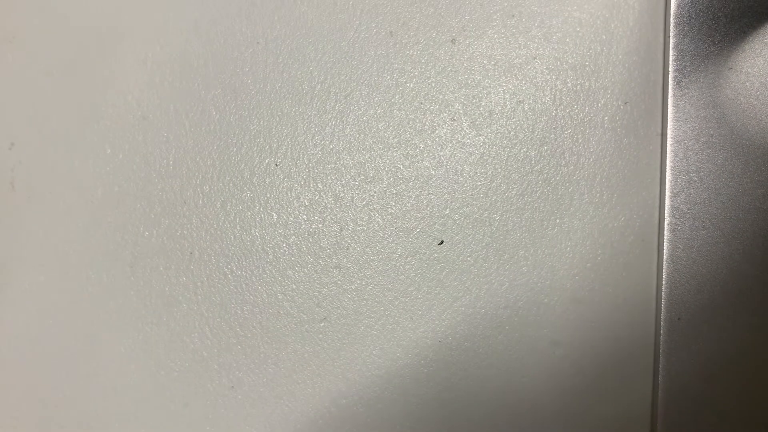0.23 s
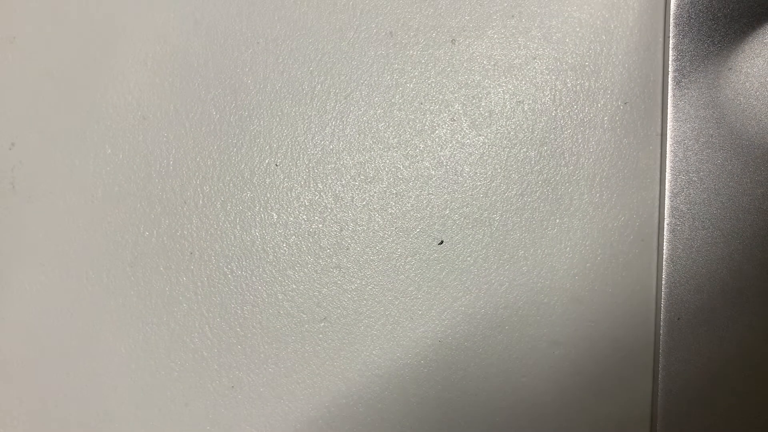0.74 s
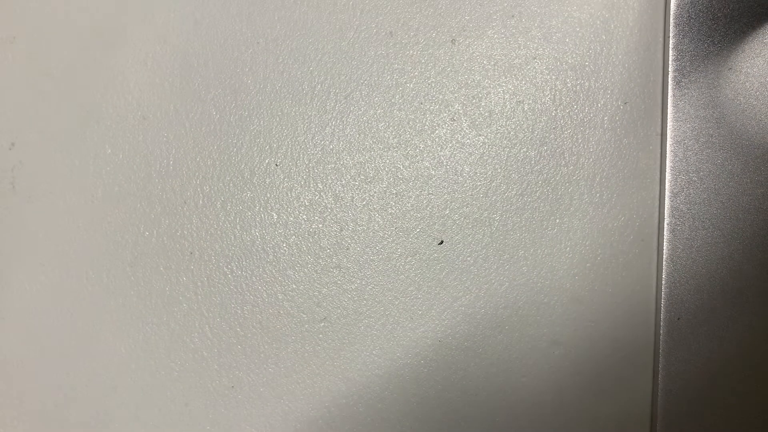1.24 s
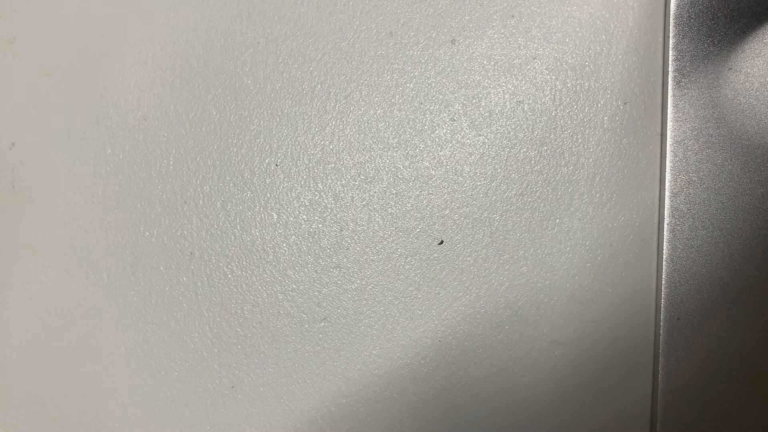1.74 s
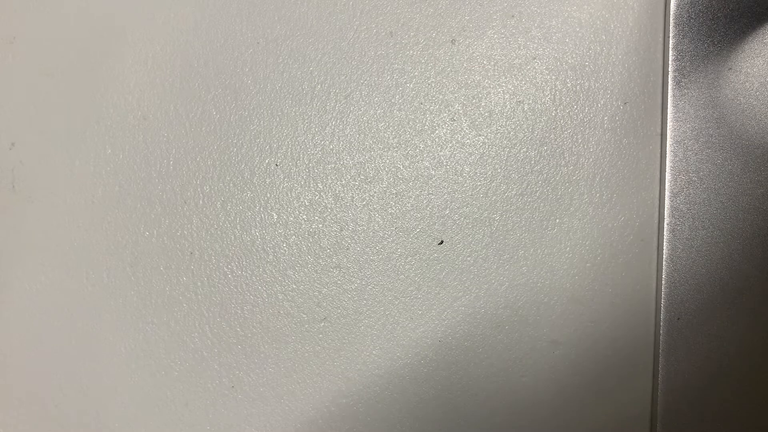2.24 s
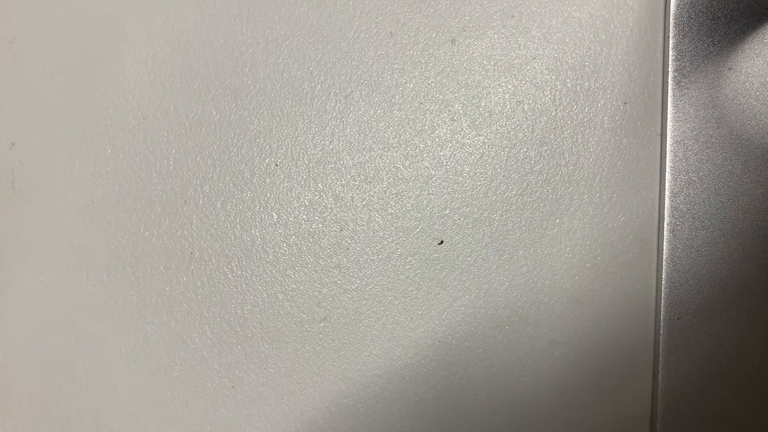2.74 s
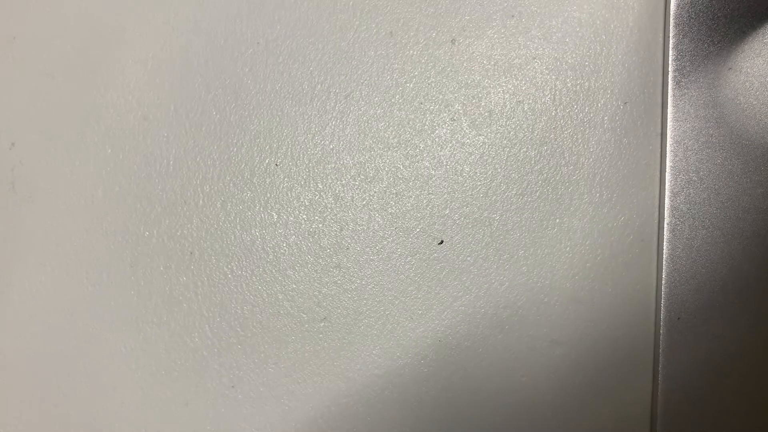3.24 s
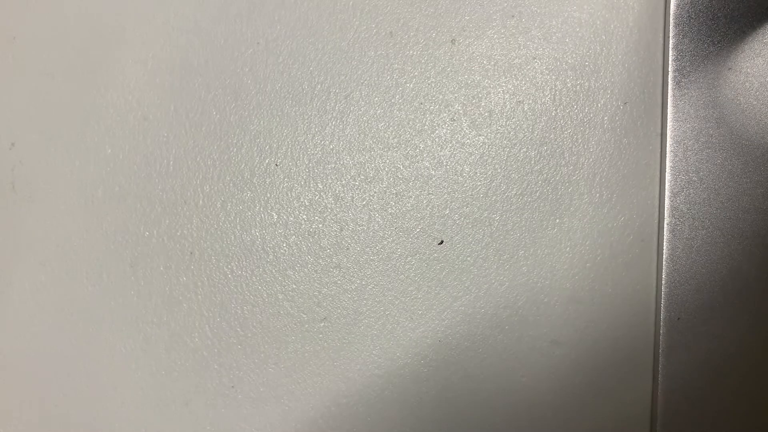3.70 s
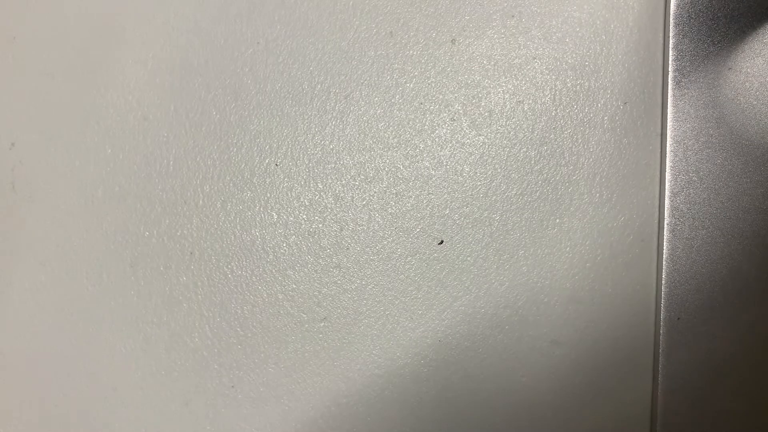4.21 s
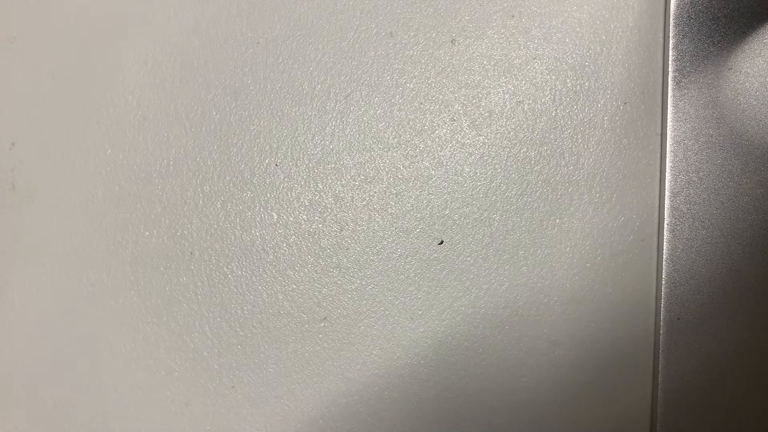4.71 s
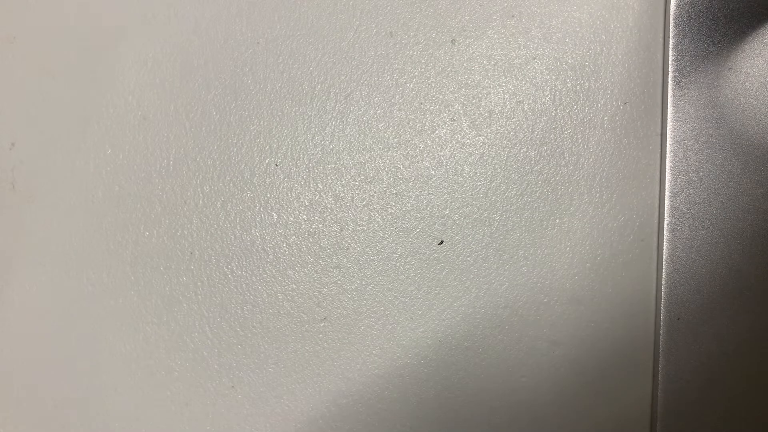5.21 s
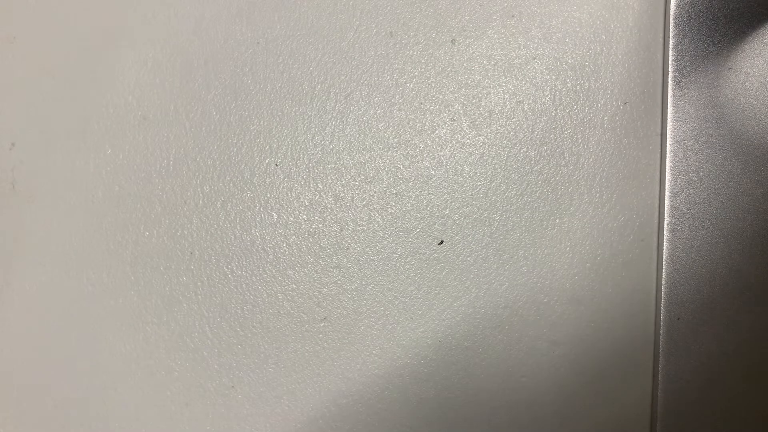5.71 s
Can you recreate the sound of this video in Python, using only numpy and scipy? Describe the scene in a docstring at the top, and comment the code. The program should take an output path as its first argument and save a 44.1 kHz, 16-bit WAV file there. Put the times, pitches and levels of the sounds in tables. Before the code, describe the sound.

A plastic blister pack is pulled from its card backing by hand, close to a stereo microphone in a small furnished room. A short rip opens the sound; at 0.2 seconds sharp snaps, tearing and soft hollow knocks come together, followed by rubbing and scattered pops until 0.8. A bright, strong cluster of cracks bursts at 1.2, then duller snaps at 1.4 and 1.6. Lighter clicks and crinkles continue, with a pop near 2.1 and a small rip at 2.7. A low thud at 2.95 leads to a hard snap at 3.1, then a dense flurry of buckling and tearing from 3.4 to 3.7. From 4 to 5.2 it is sparser: faint ticks, finger slides, muted knocks. A clear snap at 5.5 and a scraping rip around 5.7 end it. Each snap is dry with a brief plastic ring and a short room tail. Quiet air and a faint wavering low hum persist.

```python
"""A small furnished room: hands pull a plastic blister pack open, close to a stereo recorder.
The thin shell buckles in sharp snaps of decaying noise and ringing modes; the card backing tears away
in short rips built of many tiny fractures. Fingers rub and crinkle the pack, as noise with stick-slip grains,
and now and then knock it so that it booms softly, as a decaying sine with a scuff of noise.
Still air and a wavering low hum lie underneath."""
import sys
import numpy as np
from scipy import signal
from scipy.fft import rfft, irfft, next_fast_len
from scipy.io import wavfile

SR = 44100
rng = np.random.default_rng(int(sys.argv[2]) if len(sys.argv) > 2 else 0)


def digitize_waveform(pressure):
    """Quantize a signal to 16-bit integers and store it at the path in sys.argv[1].

    Rows of a 2-D input are taken as channels; values are limited to [-1, 1].
    """
    field = np.atleast_2d(pressure).T
    bounded = np.clip(field, -1, 1)
    quanta = np.round(bounded * 32767).astype(np.int16)
    wavfile.write(sys.argv[1], SR, quanta)


N = 262517
TIME = np.arange(N) / SR


def from_db(db):
    """Decibels to gain."""
    return 10 ** (np.asarray(db) / 20)


def rms_one(x):
    """Scale to unit power."""
    return x / np.sqrt(np.mean(x ** 2) + 1e-20)


def at_hz(points, hz):
    """Read a curve on a log-frequency axis."""
    where, value = np.transpose(points)
    return np.interp(np.log(np.maximum(hz, 1)), np.log(where), value)


def shaped(x, gain_at):
    """Filter by a gain that is a function of frequency."""
    size = next_fast_len(x.shape[-1] + 2048)
    hz = np.arange(size // 2 + 1) * SR / size
    return irfft(rfft(x, size) * gain_at(hz), size)[..., :x.shape[-1]]


def coloured(x, spectrum):
    """Filter a sound by a gain curve in dB."""
    return shaped(x, lambda hz: from_db(at_hz(spectrum, hz)))


# Borders of the four registers: low, body, crack, tick [Hz]
REGISTER_BORDERS_HZ = [250, 800, 2200, 5500, 16500]


def register(x, index):
    """Band-pass one of the four registers: low, body, crack, tick."""
    borders = REGISTER_BORDERS_HZ[index:index + 2]
    return signal.sosfilt(signal.butter(3, borders, "band", fs=SR, output="sos"), x)


def resonance(x, hz, width_hz):
    """Two-pole resonator with a gain of about 1 at its peak."""
    r = np.exp(-np.pi * width_hz / SR)
    feedback = [1, -2 * r * np.cos(2 * np.pi * hz / SR), r * r]
    return signal.lfilter([(1 - r * r) / 2, 0, (r * r - 1) / 2], feedback, x + 1e-18)


def drift(per_s):
    """Slow random wander around 0: normal draws, per_s of them each second, joined by lines."""
    knots = rng.standard_normal(int(N / SR * per_s) + 2)
    return np.interp(TIME * per_s, np.arange(len(knots)), knots)


# How unlike a noise is on left and right: columns pitch_hz [Hz], side_minus_mid_db [dB]
STEREO_SPREAD = [(200, -8.5), (700, -3), (1500, -3.5), (4000, -2), (6000, 1.5), (8000, -25), (16000, -13)]


def stereo_noise(size):
    """White noise for left and right: a shared mid and a side of opposite sign, evened to a flat power."""
    mid, side = rng.standard_normal((2, size))
    pair = mid + coloured(side, STEREO_SPREAD) * np.array([[1], [-1]])
    return shaped(pair, lambda hz: 1 / np.hypot(1, from_db(at_hz(STEREO_SPREAD, hz))))


def grains(size, per_s, spread_db):
    """Envelope of tiny fractures: random moments, mostly small, each decaying exponentially."""
    decay_s = 0.0015   # time constant
    born = rng.random(size) < per_s / SR
    sizes = from_db(spread_db * np.minimum(rng.exponential(1, size), 4))
    return rms_one(signal.lfilter([1], [1, -np.exp(-1 / (decay_s * SR))], born * sizes + 1e-18))


def swell_at(t, half_length_s):
    """A smooth rise and fall around time zero."""
    return np.exp(-np.minimum((t / half_length_s) ** 2, 50))


def tone(level_db, depth_db, bright_db, lift_db=0):
    """Levels of the four registers: depth sets the low one, brightness the two upper ones, lift the crack alone."""
    tick_db, tick_follows = -2, 1.15   # offset of the tick register, and its share of the brightness
    return level_db + np.array([depth_db, 0, bright_db + lift_db, tick_follows * bright_db + tick_db])


def voiced(burst, levels_db, length_s):
    """Share a burst's energy among the registers; levels are rms over the given length."""
    mix = 0
    for k, db in enumerate(levels_db):
        mix = mix + from_db(db) * rms_one(register(burst, index=k))
    return mix * np.sqrt(length_s * SR / burst.shape[-1])


def add(out, start_s, sound):
    """Mix a sound in at a moment, trimmed to the scene."""
    at = round(start_s * SR)
    part = sound[:, max(-at, 0):N - at]
    out[:, max(at, 0):max(at, 0) + part.shape[1]] += part


# Still air in the room: columns pitch_hz [Hz], level_db [relative dB per Hz]
AIR_SPECTRUM = [(18, -30), (30, -38.5), (50, 5), (65, -1), (90, -4.5), (150, -3.5), (250, -10), (420, -20),
                (1300, -23.5), (3300, -26), (6500, -38), (16000, -52)]


def background(air_db=-54, hum_db=-62, hum_hz=59.5, wander_rad=0.57, waver_db=4):
    """Still air as shaped noise, and a low sine hum that wavers in phase and level."""
    air = rms_one(coloured(stereo_noise(N), AIR_SPECTRUM))
    hum_phase = 2 * np.pi * hum_hz * TIME + wander_rad * drift(21)
    hum_gain = from_db(waver_db * np.tanh(drift(12)))
    hum = rms_one(np.sin(hum_phase) * hum_gain)
    return from_db(air_db) * air + from_db(hum_db) * hum


def room(x, t60_s=(.28, .27, .25, .2), wet_db=(-6, -5.5, -7, -8), first_s=0.00076, echo_s=0.0094, echo_db=-17):
    """One near surface throws back an echo, and a diffuse tail dies soonest in the treble."""
    t = TIME[:22050]
    diffuse = stereo_noise(len(t)) * np.clip(t / first_s - 1, 0, 1)   # silent up to first_s
    response = np.zeros_like(diffuse)
    for k in range(len(t60_s)):
        fade = from_db(-60 * t / t60_s[k])
        response += from_db(wet_db[k]) * register(diffuse * fade, index=k) / np.linalg.norm(fade)
    response[:, round(echo_s * SR)] += from_db(echo_db)
    return signal.fftconvolve(x, response, axes=1)[:, :N]


# Lasting resonances of the pack and its surroundings: columns pitch_hz [Hz], width_hz [Hz],
# level_db [dB, relative to one another]
RESONANCES = [(144, 21, 11), (316.4, 9.5, 4.5), (577, 88, 0.5), (711, 54, -18.5), (770, 12, -8.5),
              (999, 7.5, 3), (1110, 6.6, -30), (1171.5, 25, 2.5), (1277, 45, -7), (1330, 22, -12),
              (1543, 25, -0.5), (1918, 162, -4.5), (2120, 30, -40.5), (2575, 43, -2), (2789, 68, 1),
              (6480, 90, -3)]


def ringing(pack):
    """The pack's noises wake narrow resonances, which ring on after them."""
    woken = 0
    for hz, width_hz, level_db in RESONANCES:
        woken = woken + from_db(level_db) * resonance(pack, hz, width_hz)
    return woken


def crinkle(per_s=70, ring_q=11, patchy_db=2.0, tilt_db_per_octave=-2, count=18):
    """Tiny creases give way at random; each size rings at its own pitch and comes in flurries, the smallest faintest."""
    noise, out = stereo_noise(N), 0
    for hz in np.geomspace(750, 14000, count):
        creases = grains(N, per_s, spread_db=2.0) * from_db(patchy_db * drift(30))
        ring = rms_one(resonance(noise * creases, hz, hz / ring_q))
        out = out + from_db(tilt_db_per_octave * np.log2(hz)) * ring
    return rms_one(out)


# Faint rustle of the pack held in the hands: columns time_s [s], body_db [relative dB], hiss_db [relative dB]
GRIP_RUSTLE = [(0.0, -46.5, -63), (0.23, -59, -61), (0.66, -47, -58), (1.08, -57, -52.5),
               (2.17, -58.5, -66), (2.35, -54, -65), (2.75, -57, -61), (2.93, -51.5, -60), (3.53, -59, -47),
               (3.71, -65, -54), (3.93, -52, -56), (4.17, -50.5, -54), (5.19, -65, -78), (5.49, -54, -62),
               (5.63, -51.5, -57), (5.95, -68, -69)]
# A finger slides over the pack: columns middle_s [s], half_length_s [s], level_db [dB before the mix],
# depth_db [dB, low register against body], bright_db [dB, brightness]
FINGER_SLIDES = [(0.158, .025, -48.5, -10, 8.5), (0.321, 0.073, -40.5, -9.5, -5),
                 (0.646, 0.035, -55.5, -11, 1), (0.92, 0.059, -57, -7, 10), (1.13, 0.086, -56, -11, 9),
                 (1.486, 0.042, -44.5, -6.5, -3), (1.814, 0.026, -55, 2, -14), (1.902, 0.044, -60, -1, 7),
                 (2.067, 0.026, -44.5, -4, -8.5), (2.208, 0.1, -54.5, -14, -2), (2.307, 0.022, -58, 0, 2),
                 (2.567, 0.042, -47.5, -5, -6), (2.946, 0.067, -56, -0.5, 2.5),
                 (3.249, 0.032, -51, -4, -0.5), (3.433, .025, -55, -14, 9), (3.508, 0.06, -43.5, -9, 2.5),
                 (3.697, 0.0059, -40.5, -13, -6.5), (3.954, 0.046, -49.5, -7, 6.5),
                 (4.088, 0.026, -46.5, -14, -10), (4.372, .04, -49.5, 1, -2.5),
                 (4.467, 0.093, -52.5, -8, -7.5), (4.747, 0.11, -53.5, -7, -1.5),
                 (4.949, 0.017, -56, -12, 8.5), (5.318, 0.091, -60.5, -7, -10.5),
                 (5.486, 0.087, -55.5, -11, -3.5), (5.745, 0.033, -40.5, -9, -12),
                 (5.865, 0.02, -52.5, -6, -3.5)]


def friction_gains(rustle_db=-5.5, rustle_depth_db=-7, rustle_crack_db=-4, slide_crack_db=1.0):
    """Strength of the friction in each register: every slide swells and fades over the rustle of the grip."""
    s, body_db, hiss_db = np.transpose(GRIP_RUSTLE)
    crack_db = (body_db + hiss_db) / 2 + rustle_crack_db
    registers_db = [body_db + rustle_depth_db, body_db, crack_db, hiss_db]
    power = np.array([from_db(rustle_db + np.interp(TIME, s, db)) ** 2 for db in registers_db])
    for middle_s, half_length_s, level_db, depth_db, bright_db in FINGER_SLIDES:
        lift_db = slide_crack_db - bright_db / 2   # the crack register follows brightness by half
        gains = from_db(tone(level_db, depth_db, bright_db, lift_db))
        power += np.outer(gains, swell_at(TIME - middle_s, half_length_s)) ** 2
    return np.sqrt(power)


# Colour of the plastic: columns pitch_hz [Hz], level_db [relative dB per Hz]
PLASTIC_COLOUR = [(200, 3), (400, -10), (620, -7), (1300, 6.5), (2000, -0.5), (2700, -3), (3150, -2.5),
                  (4000, 4), (5400, -7.5), (7500, -10.5), (11000, -9.5), (15200, -17.5)]


def rubbing(slips_per_s=1100, smooth_share=0.99, uneven_db=2, crinkle_db=1, trim_db=(-1, -.5, -1, .5)):
    """Stick and slip: a rough hiss and the crinkle follow the fingers, each register wavering on its own."""
    slips = smooth_share + grains(N, slips_per_s, spread_db=3)
    hiss = rms_one(coloured(stereo_noise(N) * slips, PLASTIC_COLOUR))
    friction = hiss + from_db(crinkle_db) * crinkle()
    out = 0
    for k, gain in enumerate(friction_gains()):
        waver = from_db(trim_db[k] + uneven_db * drift(70))
        out = out + gain * waver * rms_one(register(friction, index=k))
    return out


# Soft knocks on the pack: columns start_s [s], pitch_hz [Hz],
# level_db [dB, swing amplitude before its rise and decay], t60_s [s]
SOFT_KNOCKS = [(0.221, 217, -30, 0.062), (0.226, 323, -25, 0.052), (1.221, 297, -32, 0.057),
               (1.403, 338, -28.5, 0.026), (2.957, 60.7, -23, 0.083), (3.088, 395, -35.5, 0.042),
               (3.327, 330, -27, 0.055), (3.467, 383, -18, 0.026), (3.587, 128, -37.5, 0.18),
               (3.693, 296, -36.5, 0.14), (4.021, 305, -29, 0.18), (4.113, 149, -33, 0.07),
               (4.379, 480, -38.5, .06), (4.579, 210, -25.5, 0.035), (4.697, 681, -28, 0.07),
               (4.806, 192, -32, 0.061), (5.227, 206, -60, 0.055), (5.226, 730, -43, 0.037),
               (5.53, 299, -41, 0.28)]


def knocks(rise_cycles=0.54, scuff_db=-7, scuff_t60_s=0.079):
    """A fingertip scuffs the pack and sets the whole of it swinging; the grip decides the pitch."""
    out, t = np.zeros((2, N)), TIME[:16384]
    for start_s, hz, level_db, t60_s in SOFT_KNOCKS:
        swing = np.sin(2 * np.pi * hz * t) * from_db(-60 * t / t60_s)
        rub = resonance(resonance(stereo_noise(len(t)), hz, hz), hz, hz)
        scuff = rms_one(rub) * from_db(scuff_db - 60 * t / scuff_t60_s)
        rise = 1 - np.exp(-t * hz / rise_cycles)
        add(out, start_s, from_db(level_db) * (swing + scuff) * rise)
    return out


# The card tears off the glue: columns middle_s [s], half_length_s [s],
# level_db [dB before the mix, body rms over the half length], depth_db [dB, low register against body],
# bright_db [dB, brightness]
CARD_RIPS = [(.002, 0.025, -42.5, -7.5, 3), (.176, 0.0043, -31.5, -6.5, 2), (0.245, 0.032, -45, -12, 8),
             (0.274, 0.015, -39.5, -1, -3), (0.862, 0.011, -40, -19, 2), (1.21, .014, -38.5, -11, 4),
             (1.242, 0.026, -45.5, 0, 5.5), (2.522, 0.0087, -62, -10, 5), (2.636, 0.014, -59.5, -12, 6.5),
             (2.672, 0.0099, -35.5, -13, 1.5), (2.7, 0.019, -47, -4, -3), (3.478, 0.013, -34, -5, -8),
             (3.583, 0.0032, -25.5, -9, 3.5), (4.323, 0.023, -47.5, -3.5, 2.5),
             (4.699, 0.012, -43, 0.5, -1.5), (4.808, 0.019, -51, 1.5, -11),
             (5.725, 0.032, -37.5, -10, -3.5), (5.745, 0.0076, -32.5, -18, -3)]


def rips(fibres_per_s=2500):
    """Fibres part in a quick run that swells and dies."""
    out, t = np.zeros((2, N)), TIME[:8192] - TIME[4096]
    for middle_s, half_length_s, level_db, depth_db, bright_db in CARD_RIPS:
        run = grains(len(t), fibres_per_s, spread_db=7) * swell_at(t, half_length_s)
        tear = coloured(stereo_noise(len(t)) * run, PLASTIC_COLOUR)
        add(out, middle_s + t[0], voiced(tear, tone(level_db, depth_db, bright_db), half_length_s))
    return out


# Modes of a buckling facet: columns multiple [of its ring pitch], level_db [relative dB],
# t60_cycles [cycles of the ring pitch]
FACET_MODES = [(.47, -4.5, 10.6), (1, 3.5, 19), (1.8, 0, 7.1), (3.3, -22, 34)]
# The shell buckles: columns start_s [s], pitch_hz [Hz, before random detuning],
# level_db [dB before the mix, body rms over 8 ms], depth_db [dB, low register against body],
# bright_db [dB, brightness], flutter_db [dB, flutter against crack at the onset]
SHELL_SNAPS = [(0.185, 1090, -36.5, -25, -1, -15), (0.2214, 865, -23, -7, -9, -36),
               (0.2293, 2240, -29.5, -10, -0.5, -27), (0.332, 2220, -39.5, -12, -4, -6),
               (0.3532, 2570, -32.5, -5.5, -13.5, -22), (.417, 800, -30.5, -11, 0.5, -40),
               (0.5229, 756, -39.5, -1.5, 2, 15), (0.662, 1810, -32.5, -7.5, 4, -8),
               (0.6692, 3600, -35, -5, 3, -25), (0.751, 1295, -41.5, -5.5, -3, -5),
               (0.8554, 1190, -45, -11, 8, -4), (0.9267, 1120, -57, -11, 14.5, 7),
               (1.1802, 1790, -29, -15, -1, -13), (1.2124, 1317, -24, -14.5, 4.5, -21),
               (1.2217, 2690, -22.5, -7.5, -0.5, -21), (1.2314, 2730, -36, -8, -8, -15),
               (1.3125, 6400, -60.5, -10, 10.5, -26), (1.386, 1510, -33.5, -10, -12, 8),
               (1.4014, 1950, -28.5, -2, 1, -19), (1.425, 1234, -31.5, -26, -5, -40),
               (1.463, 1410, -41.5, -8, -40, -24), (1.4973, 728, -41.5, -10, 0, -1),
               (1.5892, 1270, -23.5, -5.5, -11, -24), (1.608, 645, -33.5, -9.5, -4.5, -13),
               (1.6761, 3880, -58, -3, 11, -4), (1.7343, 737, -46.5, -10, 7, -14),
               (1.7538, 803, -44, -6, 5, -23), (1.7609, 1930, -34, -32, 1.5, -23),
               (1.836, 740, -41.5, -10, 1.5, -16), (1.881, 1490, -66, -4, 5, -10),
               (2.0071, 3770, -39.5, -8.5, 7, -22), (2.0173, 3730, -52.5, -17, 12, -22),
               (2.0851, 1290, -28.5, -11, -9.5, -11), (2.1087, 1140, -42, -19, 0, -20),
               (2.1356, 780, -41, -9, -22, -21), (2.17, 1500, -59, -6, 6, -18),
               (2.414, 2420, -46, 2.5, -4.5, 17), (2.5424, 1610, -34.5, -10, -3, -14),
               (2.652, 1310, -44, -1.5, -1.5, -18), (2.6984, 6520, -37, -6.5, 9, -21),
               (3.0891, 1720, -22.5, -3.5, -5, -24), (3.0975, 1460, -31.5, -24, -7.5, 3),
               (3.2312, 1420, -43, -16, -12, -8), (3.2897, 3070, -42.5, -3, -4, -3),
               (3.325, 735, -39.5, 0.5, -29, -10), (3.4071, 1850, -38, -3, -2, -8),
               (3.4135, 1200, -44, -22, -4, -18), (3.4347, 1550, -40, -18, 2, -24),
               (3.445, 1870, -47, -8, 6, -20), (3.4504, 1820, -43.5, 4.5, 1.5, -20),
               (3.467, 530, -24.5, -4.5, -14, -29), (3.4875, 1350, -39.5, -13, 4.5, -4),
               (3.5053, 1710, -19.5, -11.5, -30, -27), (3.5655, 727, -27.5, -4.5, -5.5, 5),
               (3.572, 737, -27, -10, -18, -20), (3.667, 2200, -33.5, -10, -3, -13),
               (4.0194, 875, -43, 0.5, -28, -21), (4.0444, 503, -49.5, -1, 5, -8),
               (4.1095, 4240, -44, -9, 1.5, -20), (4.1522, 3300, -47.5, -21, 4.5, 13),
               (4.18, 670, -50.5, -4, 3, -22), (4.3078, 1510, -38, -8.5, -6.5, -31),
               (4.485, 2760, -59, 1, 5.5, 3), (4.5758, 660, -47, -2.5, -12.5, -25),
               (4.768, 1290, -49, -3, -7, -4), (4.803, 1055, -39.5, -9, -23, -5),
               (4.945, 1420, -48.5, -7, -21, -5), (5.1526, 4600, -67, -7, 20.5, -21),
               (5.5273, 1390, -24.5, -15, -7.5, -19), (5.5648, 1220, -38, -10, -4.5, -21),
               (5.572, 557, -42, -3.5, -18, -18), (5.6074, 1430, -49, -19, 0.5, -6),
               (5.7097, 1580, -30, -34, -7, -25)]


def snaps(rise_s=0.00073, crack_t60_s=0.0081, flutter_t60_s=0.082, detune=0.044, radiates_above_hz=430):
    """A facet flips over with a crack, rings in a few modes set by its size and flutters for a moment."""
    hardest_hz, hardest_lift_db, hardest_octaves = 2780, 3, 0.86   # facets near this pitch crack hardest
    out, t = np.zeros((2, N)), TIME[:2048]
    multiple, mode_db, cycles = np.transpose(FACET_MODES)[:, :, None]
    # a small facet moves little air
    no_bass = signal.butter(3, radiates_above_hz, "high", fs=SR, output="sos")
    for start_s, hz, level_db, depth_db, bright_db, flutter_db in SHELL_SNAPS:
        lift_db = hardest_lift_db * np.exp(-(np.log2(hz / hardest_hz) / hardest_octaves) ** 2)
        levels_db = tone(level_db, depth_db, bright_db, lift_db)
        fade = from_db(-60 * t / crack_t60_s) + from_db(flutter_db - 60 * t / flutter_t60_s)
        crack = rms_one(coloured(stereo_noise(len(t)) * fade, PLASTIC_COLOUR))
        pitches = hz * multiple * (1 + detune * rng.standard_normal(multiple.shape))
        phases = 2 * np.pi * (pitches * t + rng.random(multiple.shape))
        modes = np.sin(phases) * from_db(mode_db - 60 * t * hz / cycles)
        ring = rms_one(modes.sum(axis=0))
        burst = (crack + ring) * (1 - np.exp(-t / rise_s))
        add(out, start_s, voiced(signal.sosfilt(no_bass, burst), levels_db, length_s=0.008))
    return out


def scene():
    """The pack's noises, the resonances that they wake, the room, the knocks and the background."""
    pack = from_db(-1.5) * snaps() + from_db(1) * rips() + from_db(-2.5) * rubbing()
    return pack + from_db(4.5) * ringing(pack) + room(pack) + knocks() + background()


# Phase between left and right: columns pitch_hz [Hz], left_lead_rad [radians]
STEREO_PHASE = [(20, 0), (300, .15), (860, .5), (2500, .6), (4500, .9), (5600, 1.3), (6500, 0),
                (8700, -3.14), (11000, -6.28), (13400, -9.42), (15400, -12.57)]
# Level between left and right: columns pitch_hz [Hz], left_minus_right_db [dB]
STEREO_BALANCE = [(60, -1.5), (700, 0.5), (1100, 0.7), (2700, 0.5), (4000, -0.5), (6000, -2.5), (8000, -3),
                  (13000, 1)]


def record(dry):
    """The left and right channels differ in phase and level; everything above 16.1 kHz is cut steeply."""
    sides = np.array([[1], [-1]]) / 2   # each channel takes half of the difference

    def channel_gain(hz):
        """Complex gain of the left and right channel."""
        return np.exp(1j * sides * at_hz(STEREO_PHASE, hz)) * from_db(sides * at_hz(STEREO_BALANCE, hz))

    channels = shaped(dry, channel_gain)
    return signal.sosfilt(signal.ellip(10, .3, 70, 16100, fs=SR, output="sos"), channels)


dry = scene()
out = record(dry)
digitize_waveform(out)
```